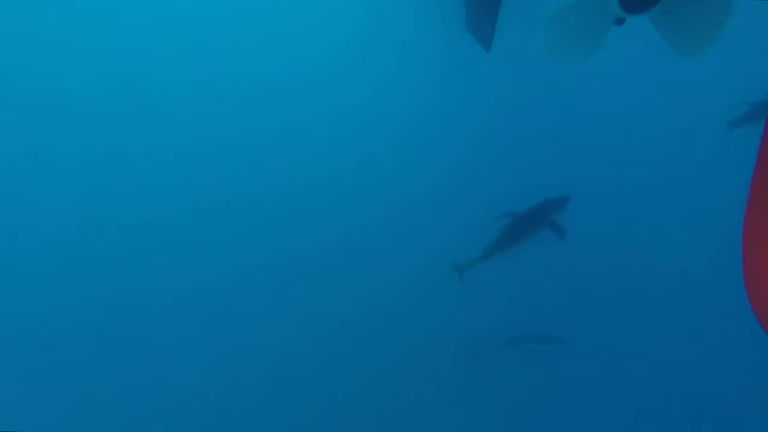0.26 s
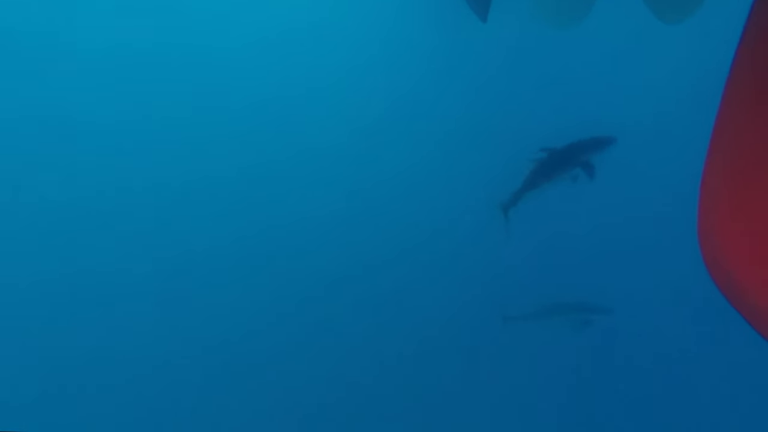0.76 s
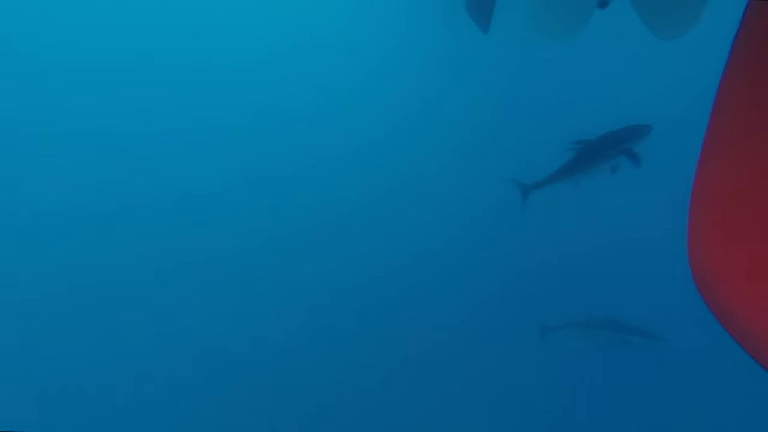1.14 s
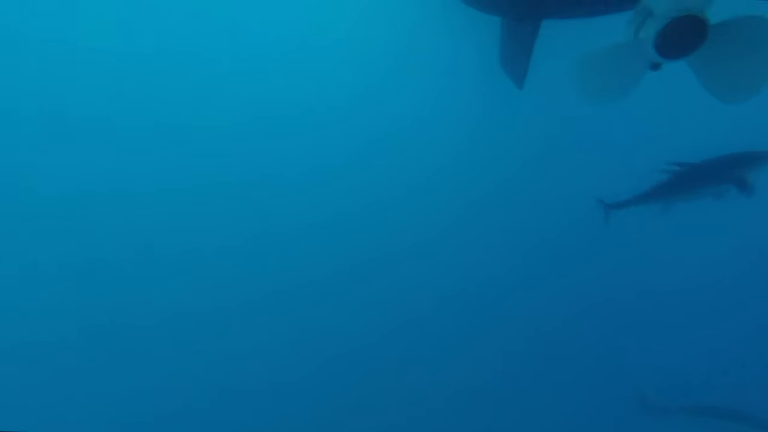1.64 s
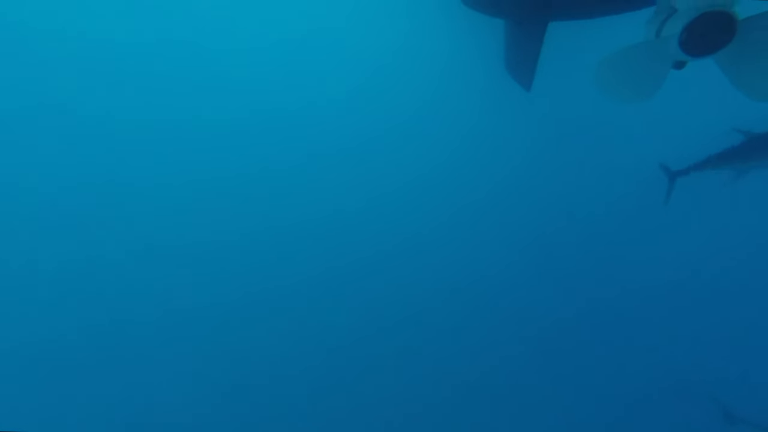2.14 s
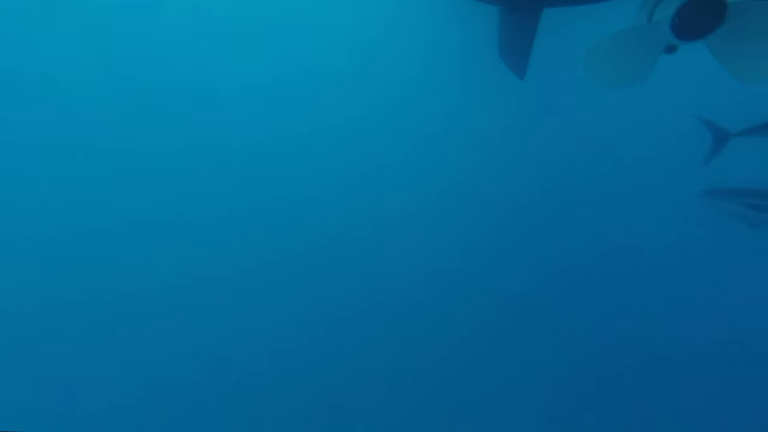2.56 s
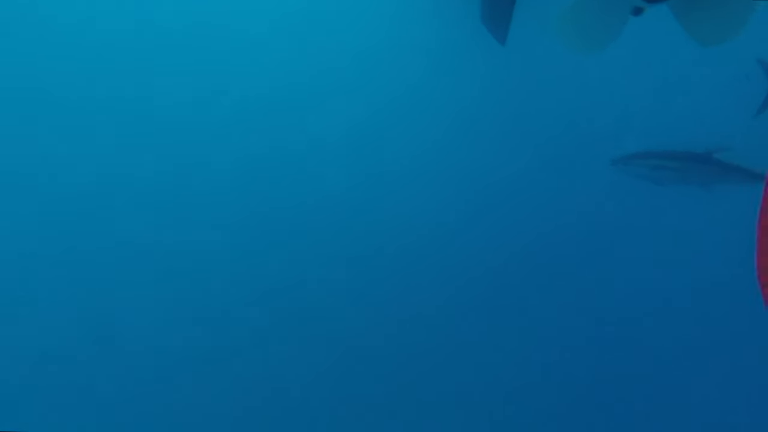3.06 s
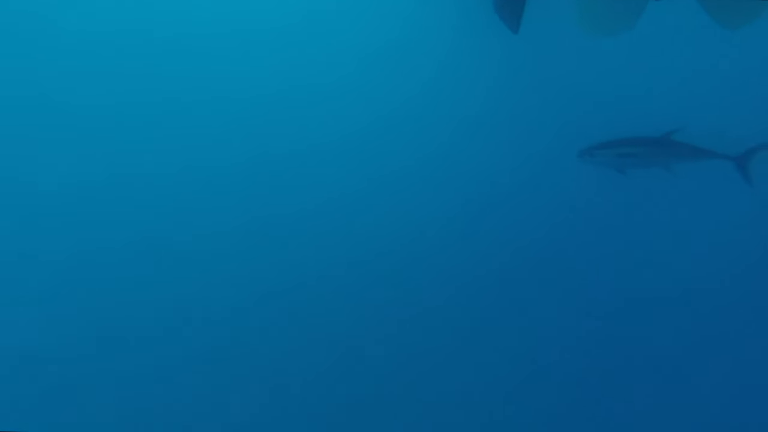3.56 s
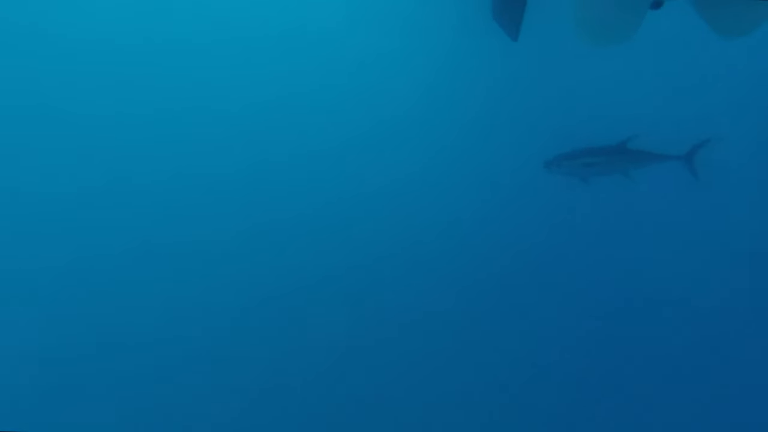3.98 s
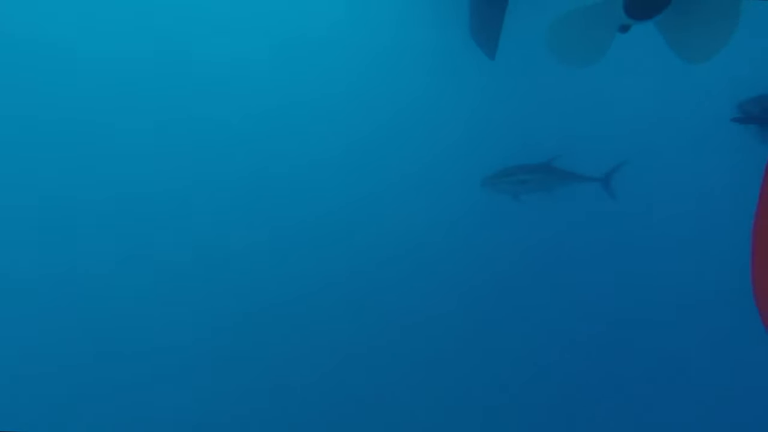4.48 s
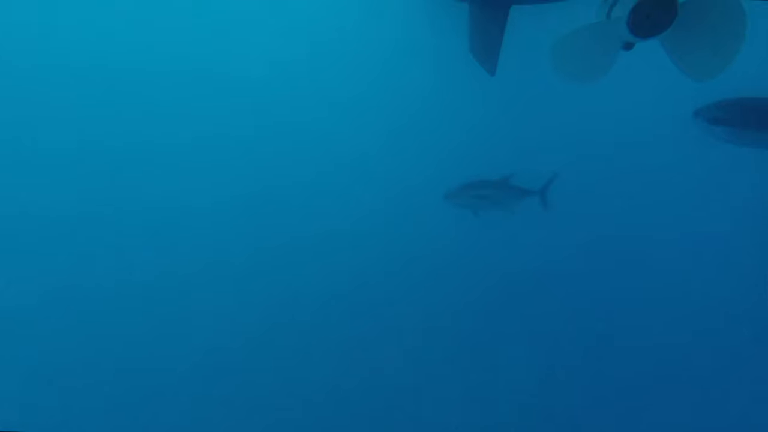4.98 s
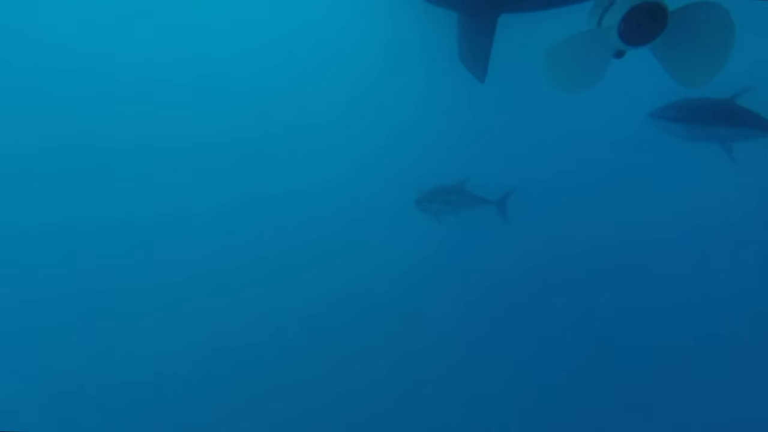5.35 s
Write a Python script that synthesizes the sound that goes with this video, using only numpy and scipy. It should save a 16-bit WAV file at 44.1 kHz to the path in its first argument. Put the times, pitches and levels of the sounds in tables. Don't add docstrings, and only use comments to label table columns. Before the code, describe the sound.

Deep, uneven water rumble and low hull knocks heard from inside a submerged housing, with tiny gurgles, clicks and a thin bubble fizz.

```python
import sys
import numpy as np
from scipy import signal
from scipy.fft import rfft, irfft, next_fast_len
from scipy.io import wavfile
from scipy.ndimage import uniform_filter1d, map_coordinates

SR = 44100
rng = np.random.default_rng(int(sys.argv[2]) if len(sys.argv) > 2 else 0)


def wav_out(sig):
    wavfile.write(sys.argv[1], SR, np.round(np.clip(np.atleast_2d(sig).T, -1, 1) * 32767).astype(np.int16))


def nominal_scale(level):
    x = np.asarray(level, float) / 20
    return 10 ** x


N = 247401


# (time [s], surge level [dB], eddy share of the surge [dB])
FLOW = [(0.0, -41, -2), (0.09, -34, -5), (0.61, -32.5, -2), (0.7, -45.5, -4), (0.8, -38, -2),
        (1.84, -40, -2.5), (1.87, -27.5, 0.5), (1.97, -37, -6), (2.28, -27, -6), (2.37, -34.5, -5.5),
        (2.75, -25.5, -3.5), (2.89, -34.5, -2), (3.08, -29, -3), (4.09, -32.5, -7), (4.37, -43, -5),
        (4.44, -33.5, -1), (4.78, -45.5, -6.5), (5.61, -45, -3.5)]


def water_flow():
    surge_db, eddy_db = curves(FLOW)
    return surge_db, eddy_db, surge_db - surge_db.mean()


# (frequency [Hz], level [dB])
SURGE_COLOUR = [(2.4, -40), (4.0, 1.5), (25, 2), (39, -5.5), (60, -18), (78, -19), (130, -120)]
# (time [s], peak level [dB], fade time [s])
SHOVES = [(.11, -32.5, .03), (.47, -35, 0.06), (.62, -41, .04), (.9, -40, 0.035), (1.12, -40, .05),
          (1.5, -44, .03), (2.55, -35, 0.037), (3.5, -37, 0.04), (3.71, -36, 0.034), (4.62, -45, .05),
          (4.91, -41, 0.043), (5.33, -44.5, .03)]


def surge(surge_db, eddy_db):
    roll = coloured(rng.standard_normal(N), SURGE_COLOUR)
    heave = unit(filtered(roll, lambda hz: hz <= 24))
    eddies = unit(filtered(roll, lambda hz: hz > 24))
    eddy_power = np.clip(nominal_scale(eddy_db) ** 2, 0.02, 0.95)
    pressure = np.sqrt(1 - eddy_power) * heave + np.sqrt(eddy_power) * eddies
    pressure = steady(pressure, window_s=0.06, share=1.0)
    pressure = unit(filtered(pressure, lambda hz: 1 / np.sqrt(1 + (hz / 52) ** 10)))
    shoves = swells(SHOVES).sum(axis=0) * steady(eddies, window_s=0.05, share=0.67)
    return nominal_scale(surge_db) * pressure + shoves


# (frequency [Hz], level [dB])
BOOM_COLOUR = [(32, -16), (55, 0), (94, 4.5), (140, -15.5), (180, -63), (310, -120)]
# (frequency [Hz], bandwidth [Hz])
HULL = [(90, 20), (130, 14)]
# (time [s], peak level [dB], fade time [s], upper mode share [0-1])
LURCHES = [(0, -42, .04, .2), (.14, -34, 0.022, 0), (.27, -37.5, 0.053, 0.6), (.62, -42, 0.15, .35),
           (.8, -52, .05, 0.4), (1.25, -37.5, 0.027, 0.6), (1.35, -45, .04, .4), (1.68, -45, 0.042, 0),
           (2.6, -45.5, 0.037, .1), (3.3, -42.5, 0.067, .5), (3.55, -46, .06, .2), (3.85, -47, .04, 0),
           (4.08, -43.5, 0.042, 0), (1.5, -39.5, 0.032, 0.7), (1.9, -41.5, 0.18, 0.04),
           (2.2, -41.5, 0.092, 0.7), (2.46, -38, 0.043, 0), (2.76, -37.5, 0.044, 0.1),
           (2.9, -36, 0.066, 0.7), (3.09, -33.5, 0.13, 0.7), (3.73, -45.5, .05, 0.2),
           (3.97, -44.5, 0.044, 0), (4.2, -36.5, 0.036, 0), (4.341, -36, 0.026, 0), (4.48, -41.5, 0.027, 0),
           (4.63, -47, 0.068, 0), (4.92, -44.5, 0.081, 0.5), (5.34, -42.5, 0.026, 0.3),
           (5.43, -49, .04, .2)]


def boom(change_db):
    lurches = swells(LURCHES)
    rest = nominal_scale(-53.5 + 0.37 * change_db)
    gain = rest + lurches.sum(axis=0)
    upper = (0.24 * rest + np.transpose(LURCHES)[-1] @ lurches) / gain
    upper = np.clip(3 * upper - 0.35, 0, 1)
    drive = coloured(rng.standard_normal(N), BOOM_COLOUR)
    first, second = [mode_added(drive, centre_hz, width_hz) for centre_hz, width_hz in HULL]
    return gain * steady((1 - upper) * first + upper * second, window_s=0.066, share=1.0)


def mode_added(drive, centre_hz, width_hz):
    def response(hz):
        damping = hz * width_hz
        return 1 + damping / np.hypot(centre_hz ** 2 - hz ** 2, damping)
    return unit(filtered(drive, response))


# (time [s], peak level [dB], first mode [Hz], second mode level [dB], third mode level [dB])
THUMPS = [(0.117, -13.5, 84, -30, -23), (1.228, -24.5, 87.6, -9, -1), (1.49, -31, 84.5, -5.5, -4.5),
          (1.659, -35, 88, -6, -12), (1.949, -27, 93, -8.5, -12), (2.041, -28.5, 82, -6, -11),
          (2.727, -18.5, 68, -16, -24), (3.098, -21, 87, -23, -6), (3.53, -28, 85, -14, -18),
          (4.32, -21, 85.6, -32, -9), (5.309, -29.5, 104, -4, -20)]


def thumps():
    out, t = np.zeros(N), np.arange(SR // 3) / SR
    t60 = 0.056
    for s, db, hz, second_db, third_db in THUMPS:
        first = nominal_scale(-60 * t / (1.76 * t60)) * np.sin(2 * np.pi * hz * t)
        second = nominal_scale(second_db + 6 - 60 * t / (2.24 * t60)) * np.sin(2 * np.pi * 185 * t)
        third = nominal_scale(third_db - 1 - 60 * t / t60) * np.sin(2 * np.pi * 335 * t)
        onset = 1 - np.exp(-t / 0.009)
        add(out, s, nominal_scale(db + 1.0) * onset * (first + second + third))
    return out


# (frequency [Hz], level [dB])
SLOSH_COLOUR = [(82, -61), (140, 0), (183, 0.5), (291, -6), (333, -6), (400, -14), (520, -17.5), (680, -75),
                (1140, -120)]
# (time [s], peak level [dB], fade time [s])
SPLASHES = [(0, -51.5, 0.036), (.11, -49, 0.033), (.42, -55, 0.054), (1.3, -54, .05), (1.62, -50.5, 0.16),
            (1.95, -46.5, 0.015), (2.05, -48, 0.019), (2.67, -58, 0.016), (2.73, -41, 0.012),
            (3.11, -54, .02), (3.27, -57, 0.03), (3.41, -53, .04), (3.55, -54, 0.014), (4.14, -58.5, 0.25),
            (5.32, -46, 0.017), (5.44, -54, 0.027)]


def slosh(change_db):
    gain = nominal_scale(-52 + 0.051 * change_db) + swells(SPLASHES).sum(axis=0)
    water = coloured(lumpy(lump_db=2.0, rate=30), SLOSH_COLOUR)
    return gain * steady(water, window_s=0.053, share=0.33)


# (frequency [Hz], bandwidth [Hz], level [dB])
POCKET = [(617, 170, 0)]
# (time [s], peak level [dB], fade time [s])
BOUTS = [(0, -48, 0.03), (.12, -52.5, 0.061), (.55, -54.5, 0.27), (1.28, -52, .03), (1.66, -59, 0.17),
         (2.05, -62, .05), (2.4, -60.5, 0.2), (2.62, -52, 0.018), (2.8, -62, .1), (3.14, -54, 0.045),
         (3.37, -50, 0.026), (3.55, -57, .03), (4.0, -57, .2), (4.3, -62, .15), (4.8, -54, 0.18),
         (5.44, -55.5, .08)]


def gurgle():
    def mode(hz):
        return sum(nominal_scale(db) * 1j * hz * width / (centre ** 2 - hz ** 2 + 1j * hz * width)
                   for centre, width, db in POCKET)
    struck = rng.random(N) < 400 / SR
    kicks = rng.standard_normal(N) * nominal_scale(2.5 * rng.exponential(size=N)) * struck
    ringing = unit(filtered(kicks, lambda hz: mode(hz) ** 2))
    gain = nominal_scale(-65) + swells(BOUTS).sum(axis=0)
    return nominal_scale(-4.5) * gain * ringing


# (time [s], peak level [dB], frequency [Hz], t60 [s])
GULPS = [(0.327, -45, 626, 0.04), (0.461, -43, 553, 0.044), (0.489, -40, 612, 0.04),
         (0.534, -43, 692, 0.04), (0.551, -55, 552, 0.04), (0.593, -36.5, 593, 0.04),
         (0.609, -44.5, 650, 0.052), (0.628, -45, 590, 0.04), (0.659, -47, 595, 0.059),
         (0.689, -42, 655, 0.032), (0.748, -35.5, 647, 0.047), (0.771, -45, 614, 0.039),
         (1.111, -47, 613, 0.12), (2.548, -42.5, 590, 0.039), (2.613, -40.5, 604, 0.079),
         (3.402, -40, 600, 0.029), (3.419, -45, 623, 0.07), (3.439, -40.5, 610, 0.063),
         (3.984, -48, 595, 0.065), (4.263, -46, 594, 0.04), (4.332, -43, 690, 0.034),
         (4.818, -38.5, 613, 0.035), (5.085, -45.5, 607, 0.052), (5.521, -33.5, 654, 0.017)]


def gulps():
    out, t = np.zeros(N), np.arange(SR // 8) / SR
    for s, db, hz, t60 in GULPS:
        envelope = nominal_scale(db + 1.5 - 60 * t / (1.12 * t60)) * (1 - np.exp(-t / 0.00093))
        add(out, s, envelope * np.sin(2 * np.pi * hz * t))
    return out


# (time [s], peak level [dB], first frequency [Hz], last frequency [Hz], case level [dB])
TICKS = [(0.53, -47, 2930, 2300, -12), (.955, -38, 1840, 500, -3.5), (0.88, -46, 2060, 2300, -1),
         (.998, -39, 1900, 550, 2), (3.7, -54, 2360, 860, -11), (3.3765, -37.5, 1096, 504, 6.5),
         (3.89, -53, 1800, 310, -11), (4.0885, -38, 1780, 840, -7), (4.6, -46, 2540, 1900, -18),
         (4.161, -44.5, 1360, 560, 0.5), (4.166, -46.5, 1330, 460, -3), (1.1, -44, 1700, 1300, -8),
         (4.392, -48, 2800, 570, -9), (0.65, -52, 1340, 590, -23)]
# (time [s], peak level [dB], frequency [Hz], t60 [s])
PINGS = [
    (3.19, -48.5, 1360, 0.053),
    (4.082, -52, 2650, .059),
    (.779, -56, 4090, .092),
]


def ticks():
    out, t = np.zeros(N), np.arange(SR // 20) / SR
    slips = [(*row, 0.016 * (1000 / row[-2]) ** 0.61) for row in TICKS]
    slips += [(s, db, hz, hz, -20, t60) for s, db, hz, t60 in PINGS]
    for s, db, first_hz, last_hz, body_db, t60 in slips:
        hz = last_hz + (first_hz - last_hz) * np.exp(-t / 0.0028)
        sweep = np.sin(2 * np.pi * np.cumsum(hz) / SR)
        rattle = unit(np.convolve(rng.standard_normal(len(t)), np.hanning(22), "same"))
        click = nominal_scale(db + 6 - 60 * t / t60) * (1 - np.exp(-t / 0.0008)) * (sweep + 0.45 * rattle)
        knock = nominal_scale(db + body_db + 8 - 60 * t / 0.022) * (1 - np.exp(-t / 0.00053))
        add(out, s, click + knock * np.sin(2 * np.pi * 350 * t))
        add(out, s + 0.00332, nominal_scale(-13) * click)
    return out


# (time [s], peak level [dB], t60 [s], level above the ringing band [dB])
SNAPS = [(0.4095, -45, 0.014, -23), (0.5187, -52, 0.013, -21), (0.7322, -65, 0.013, -24),
         (1.6573, -43, 0.012, -26), (1.7579, -38, 0.017, -13), (2.0198, -57, 0.013, -20),
         (2.3555, -46, 0.013, -21), (2.3974, -42, 0.013, -21), (2.8125, -42, 0.014, -19),
         (3.0135, -49, 0.013, -20), (3.4536, -43, 0.013, -25), (3.8292, -43, 0.013, -24),
         (4.3296, -45, 0.015, -19), (4.7785, -43, 0.021, -27), (5.0639, -40, 0.016, -27),
         (5.3597, -44, 0.013, -23)]


def snaps():
    bursts, tops = np.zeros((2, N))
    t = np.arange(SR // 10) / SR
    for s, db, t60, top_db in SNAPS:
        burst = nominal_scale(db + 56 - 60 * t / t60) * (1 - np.exp(-t / 0.001))
        add(bursts, s, burst)
        add(tops, s, nominal_scale(top_db + 13) * burst)
    return bursts, tops


# (frequency [Hz], level [dB])
WASH_COLOUR = [(260, -36), (450, -2.5), (608, -4.5), (849, -8.5), (1060, -10), (1340, -9), (1460, -13.5),
               (1650, -7), (1890, -11), (2120, -8.5), (2610, -7.5), (3450, -16.5), (4250, -14),
               (4670, -8.5), (5400, -20.5), (7020, -32), (11900, -120)]
# (frequency [Hz], level [dB])
FIZZ_COLOUR = [(3180, -61), (5400, -17.5), (5860, 1), (6250, 2), (6690, 3), (7260, -2), (8290, 0),
               (10100, -7.5), (11300, -15), (13500, -18), (14600, -28), (15400, -23)]


def fizz():
    breath_db = 0.27 * wobble(14) + 0.28 * wobble(35) + 0.5 * wobble(60) + 0.22 * wobble(3.7)
    spikes = nominal_scale(3.5 * rng.exponential(size=N)) * (rng.random(N) < 0.004)
    grit = 4.2 * uniform_filter1d(spikes, size=60)
    bursts, tops = snaps()
    ringing = nominal_scale(1.7 * breath_db) * (1 + grit + bursts) * rng.standard_normal(N)
    top = nominal_scale(0.13 * breath_db + 0.18 * wobble(14)) * (1 + grit + tops) * rng.standard_normal(N)

    def below(hz):
        return 1 / (1 + (hz / 9500) ** 8)
    high = filtered(ringing, lambda hz: below(hz) ** 0.5)
    high = high + filtered(top, lambda hz: (1 - below(hz)) ** 0.5)
    low = nominal_scale(0.37 * breath_db + 0.4 * wobble(12)) * rng.standard_normal(N)
    shared = unit(low + ringing)
    wash = filtered(low, lambda hz: hz < 4000) + filtered(shared, lambda hz: hz >= 4000)
    return nominal_scale(-56.5) * coloured(high, FIZZ_COLOUR) + nominal_scale(-54.69) * coloured(wash, WASH_COLOUR)


def steady(x, window_s, share):
    envelope = np.abs(signal.hilbert(x, next_fast_len(N))[:N])
    power = uniform_filter1d(envelope ** 2, int(window_s * SR))
    return unit(x / np.abs(power) ** (share / 2))


def swells(rows):
    t, gains = np.arange(N) / SR, []
    for s, db, fade_s, *_ in rows:
        away = np.maximum(t - s, (s - t) / 0.75)
        gains.append(nominal_scale(db) * np.exp(-away / max(fade_s, 0.005)))
    return np.array(gains)


def curves(rows):
    s, *columns = np.transpose(rows)
    return [np.interp(np.arange(N) / SR, s, column) for column in columns]


def wobble(rate):
    knots = rng.standard_normal(int(N * 200 / SR) + 4)
    return map_coordinates(knots, [np.arange(N) * min(rate, 200) / SR])


def lumpy(lump_db, rate):
    return nominal_scale(lump_db * wobble(rate)) * rng.standard_normal(N)


def filtered(x, response):
    m = next_fast_len(N + 8192)
    return irfft(rfft(x, m) * response(np.fft.rfftfreq(m, 1 / SR)), m)[:N]


def coloured(x, points):
    f, db = np.transpose(points)

    def response(hz):
        return nominal_scale(np.interp(np.log(hz + 1), np.log(f + 1), db, -120, -120))
    return unit(filtered(x, response))


def unit(x):
    return x / np.sqrt(np.mean(x ** 2) + 1e-20)


def add(track, s, sound):
    part = track[round(s * SR):][:len(sound)]
    part += sound[:len(part)]


def scene():
    surge_db, eddy_db, change_db = water_flow()
    water = surge(surge_db, eddy_db) + boom(change_db) + thumps() + slosh(change_db)
    air = gurgle() + gulps()
    return (water + air + ticks() + fizz())[None]


def top_cut(x):
    return signal.sosfilt(signal.butter(12, 15260, fs=SR, output="sos"), x)


def record(dry):
    return top_cut(dry)


dry = scene()
out = record(dry)
wav_out(out)
```